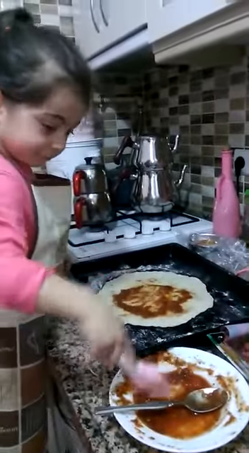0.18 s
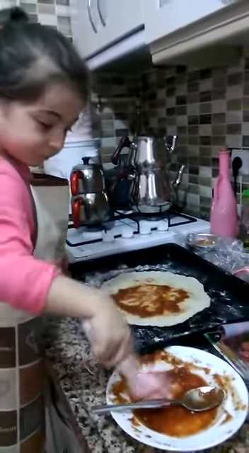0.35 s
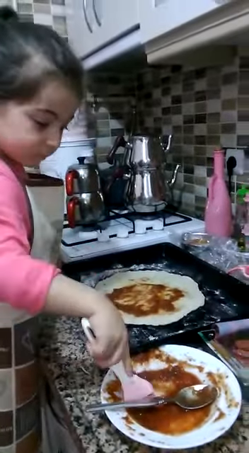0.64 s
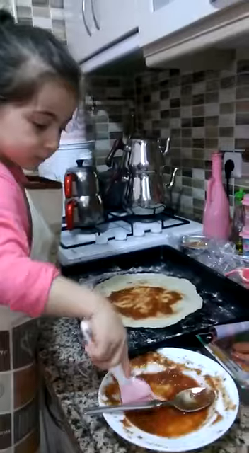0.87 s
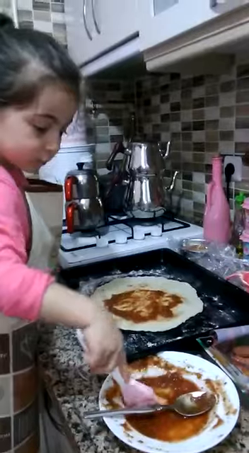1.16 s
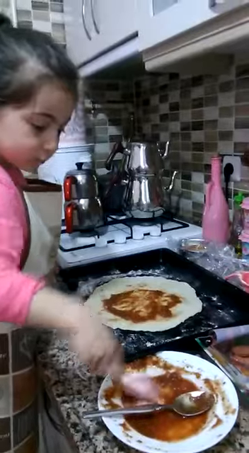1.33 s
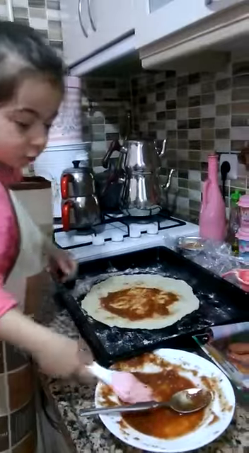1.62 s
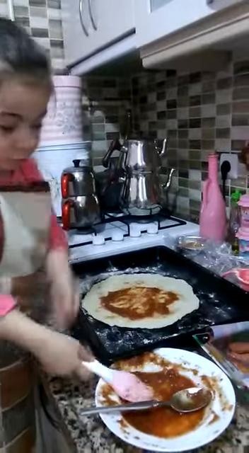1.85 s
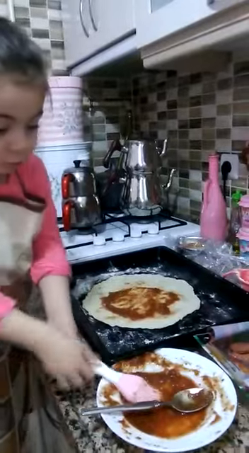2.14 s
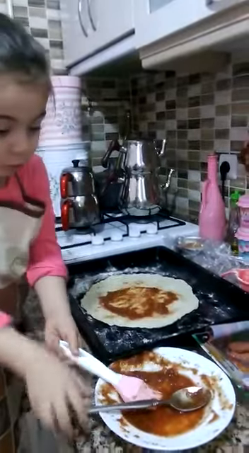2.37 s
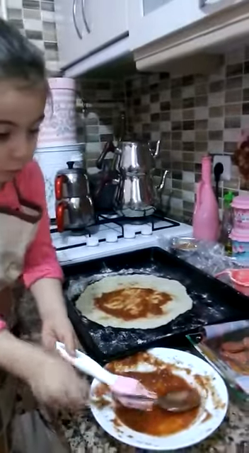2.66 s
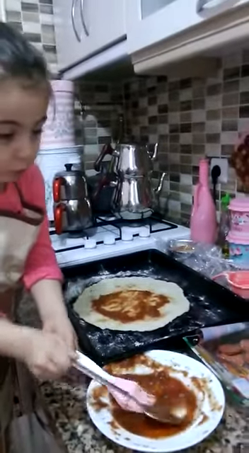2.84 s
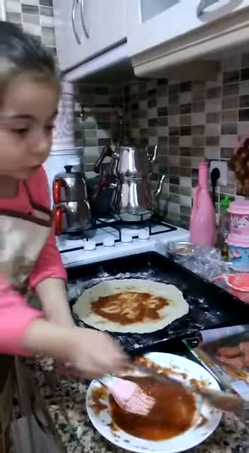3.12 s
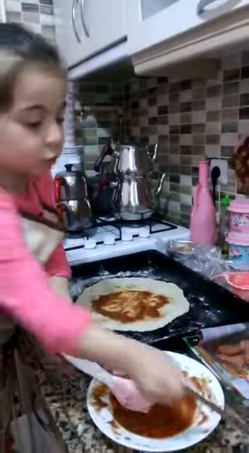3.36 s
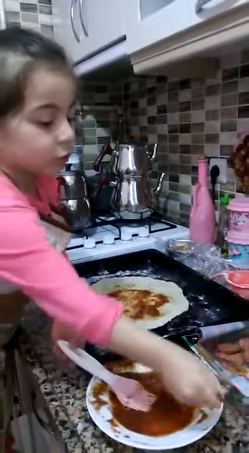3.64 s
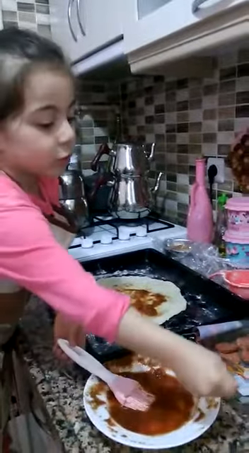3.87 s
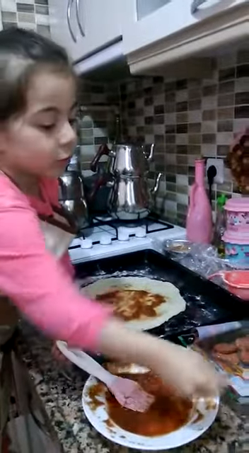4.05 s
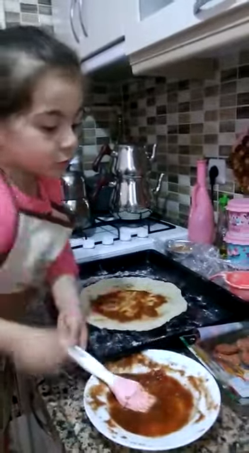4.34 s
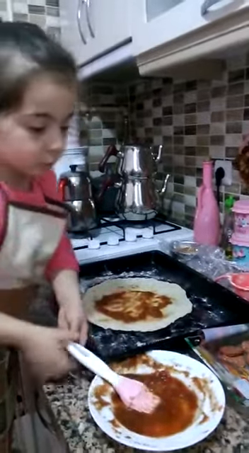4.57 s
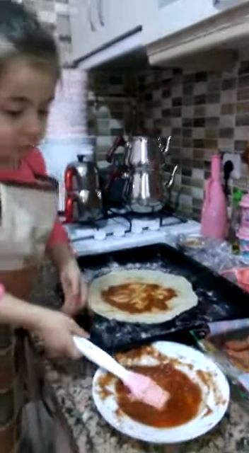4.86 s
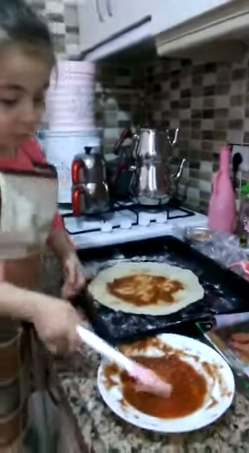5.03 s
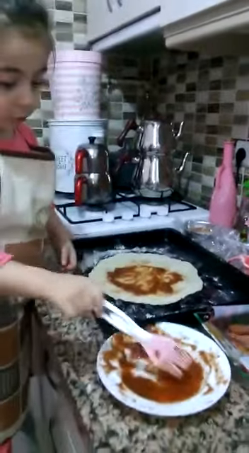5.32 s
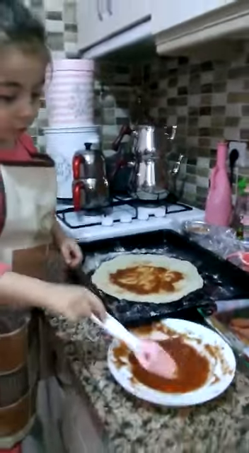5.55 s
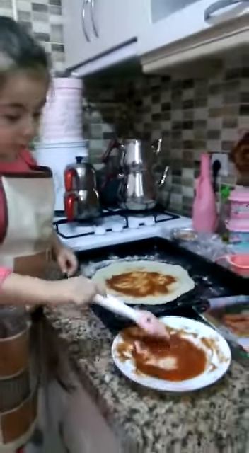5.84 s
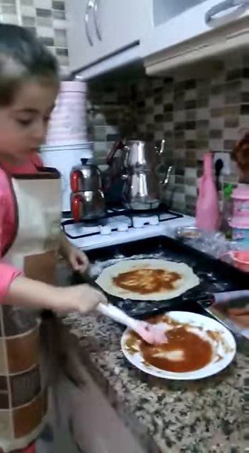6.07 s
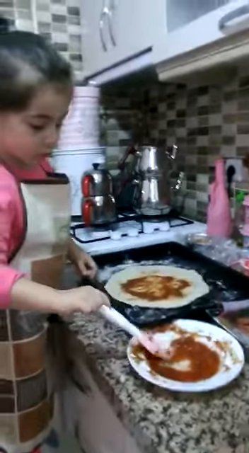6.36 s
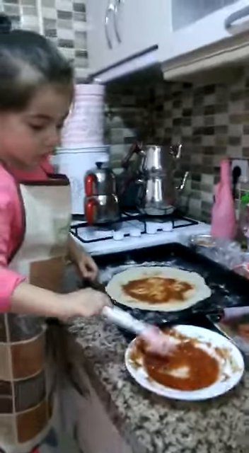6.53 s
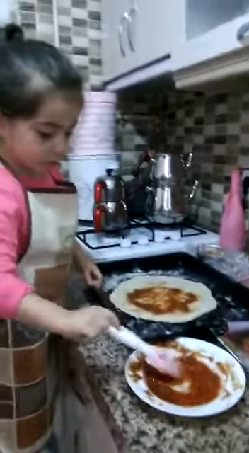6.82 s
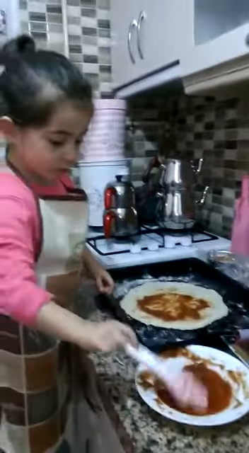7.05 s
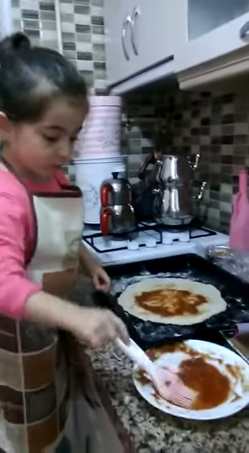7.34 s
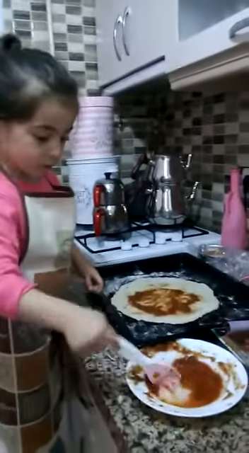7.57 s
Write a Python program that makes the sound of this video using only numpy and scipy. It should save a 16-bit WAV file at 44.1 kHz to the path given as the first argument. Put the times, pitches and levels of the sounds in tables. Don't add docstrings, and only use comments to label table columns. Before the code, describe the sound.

Close phone pickup in a small, lightly echoing kitchen. Almost silent at first, with low hum and dull bumps; then a cluster of delicate spoon taps on a plate. A bright metal knock and short slide lead into a very loud, clipped half-second rattle of cutlery on a tray, booming and ringing. It dies quickly, leaving bristles lightly wiping the glaze and a few faint ticks.

```python
import sys
import numpy as np
from scipy import signal
from scipy.fft import rfft, irfft, next_fast_len
from scipy.io import wavfile
from scipy.ndimage import uniform_filter1d

SR = 44100
rng = np.random.default_rng(int(sys.argv[2]) if len(sys.argv) > 2 else 0)


def undo_db(level):
    steps = np.asarray(level, float) / 20
    return 10 ** steps


def inscribe(sig):
    pcm = np.round(np.clip(np.atleast_2d(sig).T, -1, 1) * 32767)
    wavfile.write(sys.argv[1], SR, pcm.astype(np.int16))


N = 339323

# (time [s], peak level [dB], middle modes [dB], rim modes [dB], tail t60 [s])
PLATE_TAPS = [(1.216, -60.5, 9, 12, 0.15), (2.4, -39.5, -29, -12, 0.21), (3.046, -33.5, -41, -13.5, 0.23),
              (3.147, -38.5, -4, -8, 0.52), (3.261, -44, -1, -1, 0.43), (3.316, -54, -8, -20, 0.54),
              (3.487, -35.5, -18, -10.5, 0.24), (3.532, -44.5, -5, -30, 0.22), (3.713, -50, -19, -11, 0.23),
              (3.894, -50, 4, -16, 0.22), (4.012, -47.5, -23, -28, 0.26), (6.473, -51, 0, 13.5, 0.36),
              (6.486, -72, -13, 5, 0.35), (6.976, -56.5, 1, 10, 0.24)]
# (time [s], peak level [dB], tray boom [dB], brightness [dB], favoured boom pitch [Hz])
SPOON_SLIPS = [
    (4.083, -13.5, -15, -1, 450),
    (4.099, -21, -24, 0, 450),
    (4.17, -25, -19, -5.5, 600),
    (4.366, -36, -7.5, -4.5, 499),
    (4.38, -20.5, -26, -10, 500),
    (4.402, -26, -16.5, -1, 499.2),
    (4.437, -33, -9, -5, 508),
]
# (time [s], peak level [dB], tray boom [dB], brightness [dB], favoured boom pitch [Hz])
TRAY_BOUNCES = [(4.508, 0.5, 0.5, 0, 306), (4.529, 0, -5.5, 1, 441), (4.545, -4.5, -7, -1, 446.4),
                (4.574, -12, -6, -11.5, 698.3), (4.652, -11.5, -2, -3, 481.2), (4.689, -13, -1.5, -5, 440),
                (4.745, -7, -1, 0.5, 454), (4.764, -14, -1, -8, 282.7), (4.798, -23.5, 4, -6, 329.7),
                (4.849, -1, -7.5, -0.5, 495.4), (4.873, -10.5, 1, -18, 300), (4.912, -6.5, -6, -2.5, 400),
                (4.942, -13.5, 1, -10, 552.3), (4.97, -6.5, -1, 1.5, 300), (4.989, -7, -8.5, -6, 551),
                (5.026, -4.5, -4, -6, 602), (5.041, -6, -10, 0, 299.4), (5.075, -9.5, 0, -11.5, 650),
                (5.094, -10.5, -5.5, -4, 250), (5.119, -23.5, 3.5, -19, 240)]

SHARP_S = 0.0008


def unit(x):
    return x / np.sqrt(np.mean(x ** 2) + 1e-20)


def along(points, hz):
    f, v = np.transpose(points)
    return np.interp(np.log(hz + 1), np.log(f + 1), v)


def coloured(gain, size):
    m = next_fast_len(size)
    spectrum = rfft(rng.standard_normal(m)) * gain(np.fft.rfftfreq(m, 1 / SR))
    return unit(irfft(spectrum, m)[:size])


def add(track, s, x):
    part = track[round(s * SR):][:len(x)]
    part += x[:len(part)]


def reached(modes, hz, octaves):
    reach_db = 8.5
    nearest = sorted(modes, key=lambda mode: abs(np.log(mode[0] / hz)))
    return [(f, db - reach_db * (np.log2(f / hz) / octaves) ** 2, rest) for f, db, rest in nearest]


def ring(hz, t60, flutter, rate, attack=0.005):
    t = np.arange(SR // 4) / SR
    knots = flutter * rng.standard_normal((2, 120))
    swell, slip = (np.interp(t * rate, np.arange(120), k) for k in knots)
    phase = 2 * np.pi * hz * t
    to_silence = 1 - (t / t[-1]) ** 4
    fade = undo_db(-60 * t / abs(t60)) * (1 - np.exp(-t / attack)) * to_silence
    return ((1 + swell) * np.sin(phase) + slip * np.cos(phase)) * fade


def burst(layers, t60, body, attack=SHARP_S):
    # (frequency [Hz], tail length factor [1])
    tail_factor = [(300, 1), (1200, 1), (3000, 0.75), (6000, 0.75), (12000, 0.63)]
    t = np.arange(16384) / SR
    noise = sum(undo_db(db) * coloured(lambda hz: body(hz) * undo_db(along(shape, hz)), len(t))
                for shape, db in layers)
    hz, frame, z = signal.stft(noise, SR, nperseg=128)
    decay_s = abs(t60) * along(tail_factor, hz)[:, None]
    tail = signal.istft(z * undo_db(-60 * frame / decay_s), SR, nperseg=128)[1][:len(t)]
    rattle = undo_db(0.4 * np.interp(t * 300, np.arange(160), rng.standard_normal(160)))
    crack = 1.4 * noise * undo_db(-60 * t / 0.021)
    return (tail * rattle + crack) * (1 - np.exp(-t / attack))


def fridge():
    # (frequency [Hz], level [dB])
    hum_lines = [(99.9, -53.5), (114.1, -49), (190.1, -55), (200, -66), (214.2, -59), (228.1, -48),
                 (252.2, -60.5), (266.1, -67.5), (280.3, -60), (342.3, -64.5), (380.2, -66), (499, -69.5)]
    # (frequency [Hz], level [dB])
    drone_shape = [(30, -39.5), (60, -23.5), (95, -3), (135, -15.5), (170, -10), (222, 0), (290, -13.5),
                   (330, -17.5), (480, -19), (560, -41), (700, -59.5)]
    # (frequency [Hz], level [dB])
    edge_shape = [(400, -29.5), (520, 3), (620, -12), (700, -18), (800, -31), (1000, -53)]
    shut_db, opens_db, opens_per_db, closes_db_per_s = -73.5, -48.5, 0.63, 13
    t = np.arange(N) / SR
    lines = sum(undo_db(db + 1) * np.sin(2 * np.pi * (hz * t + rng.random())) for hz, db in hum_lines)
    step = t[::256]
    opened = [(step > s) * undo_db(opens_db + opens_per_db * db - closes_db_per_s * abs(step - s))
              for s, db, *_ in PLATE_TAPS + SPOON_SLIPS + TRAY_BOUNCES]
    opening = np.interp(t, step, undo_db(shut_db) + np.max(opened, axis=0))
    edge = opening * coloured(lambda hz: undo_db(along(edge_shape, hz)), N)
    return lines + edge + undo_db(-47.5) * coloured(lambda hz: undo_db(along(drone_shape, hz)), N)


def room_air():
    z = signal.stft(coloured(lambda hz: (hz > 600) / (hz + 9000), N), nperseg=512)[2]
    stir = uniform_filter1d(rng.standard_normal(z.shape), size=2, axis=0)
    stir = uniform_filter1d(stir, size=10, axis=1)
    patchy_air = signal.istft(z * undo_db(3.1 * unit(stir)), nperseg=512)[1][:N]
    return undo_db(-67) * patchy_air


def chimes():
    # (frequency [Hz], level [dB], t60 [s])
    spoon_modes = [(3590, -2.5, 0.52), (4100, 1, 0.15), (4950, 2, 0.27), (6710, 0, .33), (7377, -3, .3),
                   (9020, -4.5, 0.19), (9872, -0.5, 0.2), (13220, -11.5, .25)]
    bowl_modes = [(630, 1.5, 0.27), (770, -1, 0.44), (949, 4, 0.81), (1106, -0.5, 0.35), (1213, 4.5, 0.4),
                  (1345, -0.5, 0.19), (1494, -2, 0.4), (1675, -6, 0.42), (1900, -6.5, 0.63),
                  (2160, -4.5, 0.38), (2400, 1, 0.69), (2530, 3, 0.097), (2770, -3, 0.14), (3090, -4, 0.39)]
    edge_modes = [(4250, -6, 0.25), (4600, -3, 0.51), (4885, 1, 0.17), (5355, -6, 0.16), (5610, -3, 0.17),
                  (6140, -3, 0.13), (6490, -7, 0.23), (6830, -8, 0.2), (7100, -2, 0.2), (8200, -4, .2),
                  (9300, -3.5, 0.22), (9660, -3.5, 0.58)]
    # (time [s], level [dB], favoured pitch [Hz], reach [octaves])
    spoon_hits = [(2.402, -65, 4950, 0.25), (3.265, -62, 3590, .1), (3.262, -62.5, 9020, .08),
                  (3.38, -64.5, 3590, .1), (3.65, -70, 3590, 0.12), (3.898, -68, 3590, 0.075),
                  (4.171, -67, 3590, 0.1), (4.402, -36.5, 4950, 0.18), (4.402, -36, 9200, .12),
                  (4.427, -43, 6900, .15), (4.447, -36.5, 3590, .1), (4.528, -13.5, 9872, .1),
                  (4.531, -21, 7377, .08), (4.546, -24.5, 13220, 0.13), (4.653, -28, 6710, .15),
                  (4.653, -35, 9872, .1), (4.665, -30, 4950, .15), (4.851, -24.5, 4100, .1),
                  (4.852, -32, 9390, .2), (5.029, -20, 4130, .1), (5.031, -23.5, 7377, .08),
                  (5.045, -27, 4950, .15), (6.977, -64, 4100, .1)]
    bowl_hits = [(2.401, -60, 1020, 0.18), (2.4, -61, 1268, 0.16), (2.4, -55.5, 1590, .15),
                 (2.402, -56, 2770, 0.069), (3.048, -52.5, 1390, 0.32), (3.047, -63.5, 2400, 0.071),
                 (3.151, -55.5, 1106, 0.066), (3.151, -53.5, 2770, 0.14), (3.265, -53, 2160, 0.077),
                 (3.329, -59.5, 1900, .1), (3.49, -52, 1345, 0.12), (3.525, -53, 3090, 0.21),
                 (3.6, -68.5, 770, .15), (3.713, -60.5, 1345, 0.12), (3.898, -65, 770, 0.12),
                 (4.016, -62, 1345, 0.17), (4.172, -38.5, 1345, 0.14), (4.171, -42, 2577, 0.033),
                 (5.56, -69, 1900, .1), (5.78, -65.5, 1750, 0.095), (6.473, -61, 1980, .25),
                 (6.977, -57, 630, 0.097), (6.977, -66, 1345, .1)]
    edge_hits = [(0.636, -63, 5355, .06), (1.217, -64.5, 4250, 0.1), (1.217, -69, 5610, .05),
                 (1.217, -66, 7100, .05), (1.279, -70, 4600, .05), (1.489, -63.5, 6830, 0.043),
                 (3.048, -57, 4885, .05), (3.151, -53.5, 4885, 0.079), (3.151, -70, 6140, .06),
                 (3.151, -67, 9300, 0.056), (3.264, -53, 6140, 0.04), (3.49, -60.5, 4750, 0.044),
                 (4.056, -59.5, 9660, 0.073), (4.173, -55, 6140, .06), (6.473, -57, 5500, 0.064),
                 (6.473, -51, 6400, 0.17), (6.486, -70, 9000, 0.22), (6.977, -57, 6490, .05),
                 (6.976, -61, 5610, 0.048)]
    out = np.zeros(N)
    for modes, hits in [(spoon_modes, spoon_hits), (bowl_modes, bowl_hits), (edge_modes, edge_hits)]:
        for s, db, hz, octaves in hits:
            if db > -52:
                ring_share, flutter, rate = 1, 0.42, 90
            else:
                ring_share, flutter, rate = 0.77, 1.1, 190
            add(out, s, sum(undo_db(db + level + 5) * ring(f, t60 * ring_share, flutter, rate)
                            for f, level, t60 in reached(modes, hz, octaves)[:2]))
    return out


def thuds():
    # (time [s], peak level [dB])
    pushes = [
        (0.679, -46),
        (1.23, -37),
        (1.508, -36.5),
        (2.002, -42.5),
        (3.049, -52),
        (4.09, -40.5),
        (4.505, -32.5),
        (4.856, -31),
        (5.04, -36.5),
    ]
    counter_hz, t60, attack_s = 92.65, 0.35, 0.012
    out = np.zeros(N)
    t = np.arange(SR // 2) / SR
    for s, db in pushes:
        fade = undo_db(db + 8.5 - 60 * t / t60) * (1 - np.exp(-t / attack_s))
        add(out, s, fade * np.sin(2 * np.pi * counter_hz * t))
    return out


def clangs():
    # (frequency [Hz], level [dB], t60 [s])
    handle_modes = [(1010, 0.5, .2), (1170, 0, 0.17), (1280, 0, .12), (1350, 0, 0.16), (1460, 0, .13),
                    (1780, 0, 0.2), (2050, 0.5, 0.17), (2220, 0.5, .12), (2460, 0, 0.14),
                    (2560, -0.5, 0.17), (2630, -0.5, .09), (2720, -0.5, .12), (2980, 0, .2),
                    (3270, 0.5, 0.15)]
    blade_modes = [(3620, 0.00084, 0.11), (3800, 0.0017, 0.088), (4050, 0.0011, .15), (4400, 0.00042, .1),
                   (4600, 0.00036, .15), (4940, 0.0011, .2), (5500, 0, 0.096), (5800, 0.0017, 0.14),
                   (6280, 0.0004, .12), (6660, 0.00043, .1), (7700, 0, 0.084), (8990, 0.00069, .14),
                   (9872, 0, .25), (13260, 0.00058, .12)]
    # (time [s], level [dB], favoured pitch [Hz], reach [octaves])
    handle_hits = [(4.084, -30, 2620, 0.09), (4.084, -36, 1300, 0.12), (4.169, -31, 2570, 0.089),
                   (4.17, -30, 1384, 0.18), (4.367, -38, 1576, .2), (4.38, -30.5, 1780, .15),
                   (4.379, -37, 2895, .1), (4.509, -13, 2220, .1), (4.512, -14.5, 1409, .15),
                   (4.52, -16, 2700, .08), (4.535, -16.5, 1170, .1), (4.57, -21.5, 2894, .15),
                   (4.746, -22, 2460, .08), (4.746, -21.5, 1350, .1), (4.747, -24.5, 2050, .08),
                   (4.851, -13.5, 2630, .08), (4.85, -16.5, 2050, .08), (4.851, -15, 1411, .2),
                   (4.935, -20.5, 1010, .1), (4.972, -22.5, 2780, .15), (4.991, -24, 1100, .1),
                   (5.026, -15, 2720, .1), (5.026, -18.5, 3270, .06), (5.03, -22.5, 1780, .1),
                   (5.048, -21.5, 2220, .08), (5.059, -22.5, 1010, .1), (5.094, -22.5, 2560, .08),
                   (5.094, -25, 1780, 0.12), (5.13, -27, 2460, 0.078), (4.851, -19, 1170, .06),
                   (5.028, -16, 1010, .08), (4.599, -23, 1070, 0.12), (5.17, -35, 994, .06),
                   (5.4, -58.5, 993, .06), (3.259, -57, 1350, .1), (3.301, -63, 1350, .1),
                   (3.5, -57, 3100, 0.087), (3.486, -56, 2560, .06), (1.515, -70, 3270, .04)]
    blade_hits = [(4.084, -29, 4320, 0.13), (4.084, -44, 7700, .1), (4.092, -31, 3620, .06),
                  (4.17, -36.5, 6280, 0.053), (4.17, -34.5, 3620, 0.05), (4.335, -67, 6280, .05),
                  (4.367, -44.5, 8990, 0.04), (4.385, -58, 13260, .05), (4.402, -50, 13260, .05),
                  (4.435, -57, 13260, .05), (4.475, -62, 13260, .05), (4.85, -12.5, 3910, 0.065),
                  (4.85, -12.5, 5800, 0.094), (4.85, -21.5, 8990, .05), (4.856, -18.5, 4600, 0.046),
                  (4.912, -22.5, 5650, 0.07), (4.93, -23, 4400, 0.063), (4.97, -20.5, 5800, 0.088),
                  (4.975, -23.5, 6660, .06), (4.99, -21, 4820, 0.088), (5.026, -18.5, 4000, .06),
                  (5.041, -12, 3920, 0.11), (5.041, -18.5, 5800, .08), (5.041, -22, 8850, 0.034),
                  (5.06, -18.5, 6600, .08), (5.094, -21, 5500, .08), (5.11, -22.5, 3800, 0.054),
                  (1.18, -65.5, 3620, .04), (1.257, -70, 3450, .05), (1.479, -67, 4270, 0.058),
                  (2.585, -65, 6280, 0.051), (2.615, -63, 3630, 0.067), (2.635, -66, 5800, .05),
                  (2.755, -64, 3700, 0.061), (2.77, -69, 6280, .04), (2.825, -67, 4850, .04),
                  (4.383, -37, 4940, .04), (4.528, -21, 8990, .04), (4.735, -34.5, 9872, .04),
                  (4.925, -33, 9872, .04), (3.483, -59, 4760, .05), (3.38, -68, 5460, .04),
                  (1.52, -69, 4500, .05), (6.43, -67, 6280, 0.07)]
    out = np.zeros(N)
    for modes, hits in [(handle_modes, handle_hits), (blade_modes, blade_hits)]:
        for s, db, hz, octaves in hits:
            add(out, s, sum(undo_db(db + level) * ring(f, t60, flutter=0.42, rate=140, attack=SHARP_S)
                            for f, level, t60 in reached(modes, hz, octaves)[:3]))
    return out


def plate():
    # (frequency [Hz], width [Hz], level [dB])
    resonances = [(1100, 520, -14), (1250, 260, 5), (1740, 400, 7.5), (2060, 170, -12), (2480, 180, -5),
                  (2570, 560, 10.5), (3850, 390, 4.5), (4250, 270, 11), (5120, 120, 8), (5970, 640, 2),
                  (6260, 100, 5.5), (6900, 240, 3.5), (7660, 180, 4)]
    # (frequency [Hz], level [dB])
    body_shape = [(600, 5), (850, 1), (1700, -10), (2800, -11.5), (3100, -47)]
    middle_shape = [(2900, -24), (3300, 18), (4400, -15), (4700, -37.5)]
    rim_shape = [(4400, -40), (4900, 0.5), (6300, 0), (7400, -6), (9000, -30)]
    out = np.zeros(N)
    for s, db, middle_db, rim_db, t60 in PLATE_TAPS:
        woken = [(c, w, level + rng.normal(0, 4)) for c, w, level in resonances]

        def ceramic(hz):
            peaks = sum(undo_db(level) / (1 + ((hz - c) / (0.5 * w)) ** 4) for c, w, level in woken)
            return 0.066 + 0.12 * (hz < 2900) + peaks

        layers = [(body_shape, 0), (middle_shape, middle_db - 3.5), (rim_shape, rim_db - 0.5)]
        add(out, s, undo_db(db - 12.5) * burst(layers, t60, ceramic))
    return out


def brush():
    # (start [s], length [s], level [dB], favoured pitch [Hz], reach [octaves])
    strokes = [(2.509, 0.52, -68, 1820, 0.3), (2.497, 0.19, -70, 5270, 0.11),
               (2.578, 0.25, -70, 5700, 0.97), (5.219, 0.39, -53, 4370, 0.33),
               (5.251, 0.21, -64.5, 2490, 0.15), (6.196, 0.27, -64.5, 1850, 0.21),
               (6.224, 0.34, -60.5, 3680, .12), (6.303, 0.31, -71, 830, 0.334),
               (6.866, 0.25, -72.5, 4180, .05), (7.399, 0.069, -71.5, 4010, 0.53),
               (7.497, 0.43, -69.5, 2080, 0.062), (7.525, 0.45, -63, 4530, 0.74),
               (7.58, 0.24, -67.5, 830, 0.3)]
    # (frequency [Hz], level [dB], relative width [1])
    glaze_modes = [(830, -6, 0.047), (1800, 6, 0.03), (2080, 0, 0.022), (2490, -11.5, 0.049),
                   (3680, -1, 0.029), (4180, -36, 0.016), (4720, -2, 0.04), (5270, -6, 0.0078),
                   (6470, -8, 0.033), (7100, -5, 0.029)]
    out = np.zeros(N)
    for start, length, db, pitch_hz, octaves in strokes:
        stirred = reached(glaze_modes, pitch_hz, octaves)
        size = round(length * SR)

        def glaze(hz):
            return sum(undo_db(level) / (1 + ((hz - c) / (width * c)) ** 2) ** 0.82
                       for c, level, width in stirred)

        z = signal.stft(coloured(glaze, size), nperseg=256)[2]
        grip = uniform_filter1d(rng.standard_normal((129, 256)), size=2, axis=0)
        grip = uniform_filter1d(grip, size=7, axis=1)
        patchy_db = 2 if db > -64 else 4
        rub = signal.istft(z * undo_db(patchy_db * unit(grip))[:, :z.shape[1]], nperseg=256)[1][:size]
        swell = np.sin(np.pi * np.arange(size) / size) ** 0.6
        add(out, start, undo_db(db) * unit(rub) * swell)
    return out


def crash():
    # (frequency [Hz], level [dB], t60 [s])
    tray_modes = [(227.06, 2, 0.44), (270.8, -5, 0.45), (339.4, -2.5, .33), (384.4, -13.5, 0.47),
                  (483.9, -2.5, 0.36), (550.2, 4, 0.23), (607, 1.5, 0.44), (651.6, 1.5, 0.15),
                  (787, -8, 0.31), (886, -5.5, 0.45), (957, -10.5, 0.27), (1161, -8.5, 0.18)]
    # (frequency [Hz], level [dB])
    knock_shape = [(500, -18), (900, -1), (1500, -4), (2800, -2.5), (4000, -9.5), (6000, -37.5)]
    clink_shape = [(2500, -30), (3800, 1), (5500, 1), (7500, -3.5), (9500, -28), (12000, -54)]
    sizzle_shape = [(7000, -32), (8800, 5), (10200, -3.5), (11200, -7.5), (13300, -8.5), (14200, -12),
                    (14600, -59.5)]
    slide_shape = [(7000, -25), (8800, 6), (10100, 0.5), (10700, -40), (12700, -40), (13300, -14),
                   (14100, -16), (14600, -59)]
    released_s, landed_s = 4.3, TRAY_BOUNCES[0][0]
    out = np.zeros(N)
    for s, db, boom_db, bright_db, boom_hz in SPOON_SLIPS + TRAY_BOUNCES:
        comb = rng.standard_normal(260)

        def cutlery(hz):
            return undo_db(2.3 * np.interp(hz / 70, np.arange(260), comb))

        if s < released_s:
            top_shape, top_db = sizzle_shape, -26
        elif s < landed_s:
            top_shape, top_db = slide_shape, -6
        else:
            top_shape, top_db = sizzle_shape, -14
        hard = db > 0
        top_db += 1.3 * bright_db + 5.5 * hard
        t60 = 0.33 if hard else 0.38
        glancing = s > landed_s and db < -6.5
        layers = [(knock_shape, 0), (clink_shape, bright_db), (top_shape, top_db)]
        add(out, s, undo_db(db - 12) * burst(layers, t60, cutlery, 0.003 if glancing else SHARP_S))
        boom = sum(undo_db(level + rng.normal(0, 2.4)) * ring(hz, life, flutter=0.98, rate=70)
                   for hz, level, life in sorted(reached(tray_modes, boom_hz, 1.96)))
        add(out, s, undo_db(db + boom_db - 10) * boom)
    return out


def scene():
    steady = fridge() + room_air()
    contacts = chimes() + thuds() + clangs() + plate() + brush() + crash()
    return (steady + contacts)[None]


def band_limit(x):
    return signal.sosfilt(signal.butter(12, 15590, fs=SR, output="sos"), x)


def record(dry):
    # (frequency [Hz], threshold [dB])
    gate_threshold = [(650, -110), (900, -83.5), (2000, -87.5), (6000, -92), (9500, -91), (10700, -80.5),
                      (11600, -89), (12500, -82.5), (13300, -90.5)]
    # (frequency [Hz], level [dB])
    hiss_shape = [(400, -21.5), (700, -1.5), (1100, 0), (2000, -3.5), (5000, -7), (10000, -9),
                  (14000, -7.5), (15400, -28)]
    hz, _, z = signal.stft(dry, SR, nperseg=512, noverlap=384)
    power = abs(z) ** 2
    held = np.maximum(signal.lfilter([0.12], [1, -0.88], power, axis=2), 0.15 * power)
    threshold = undo_db(2 * along(gate_threshold, hz))[:, None]
    keep = np.clip(1 - threshold / (held + 1e-20), 0, 1) ** 4.3
    band = (hz < 14300)[:, None]
    x = signal.istft(z * keep * band, SR, nperseg=512, noverlap=384)[1][:, :N]
    x = x + undo_db(-76.5) * coloured(lambda hz: undo_db(along(hiss_shape, hz)), N)
    x = x / (1 + abs(x / 1.02) ** 30) ** (1 / 30)
    return band_limit(x)


dry = scene()
out = record(dry)
inscribe(out)
```